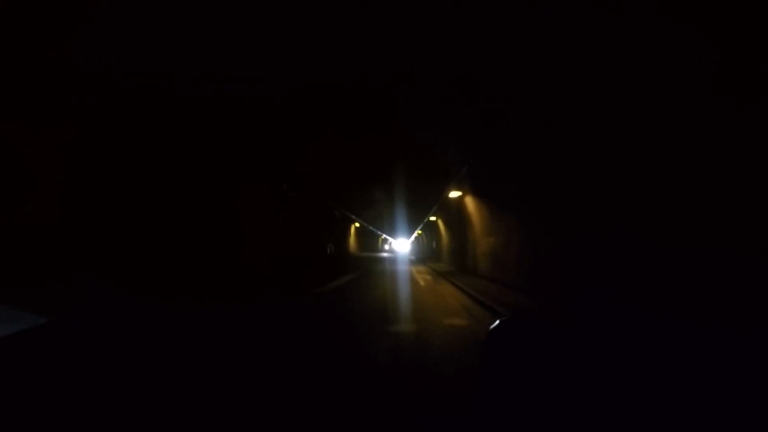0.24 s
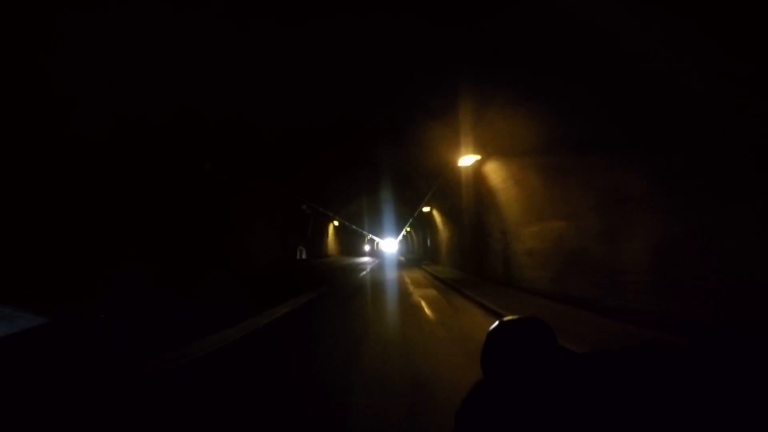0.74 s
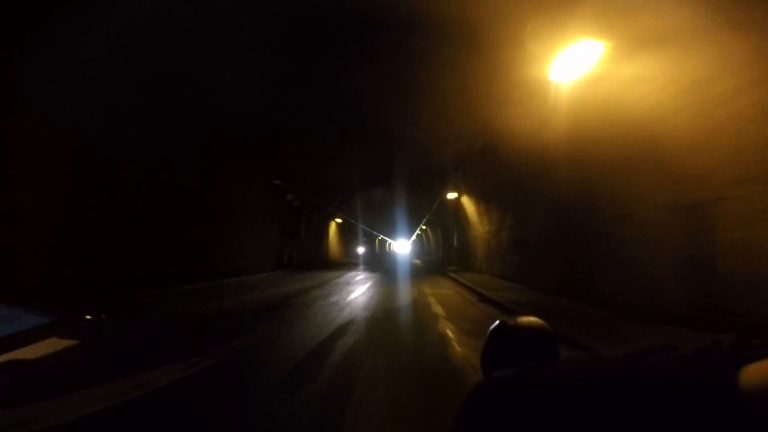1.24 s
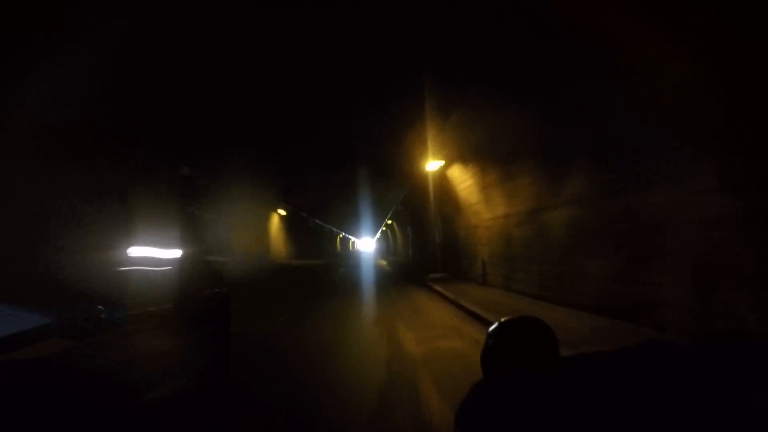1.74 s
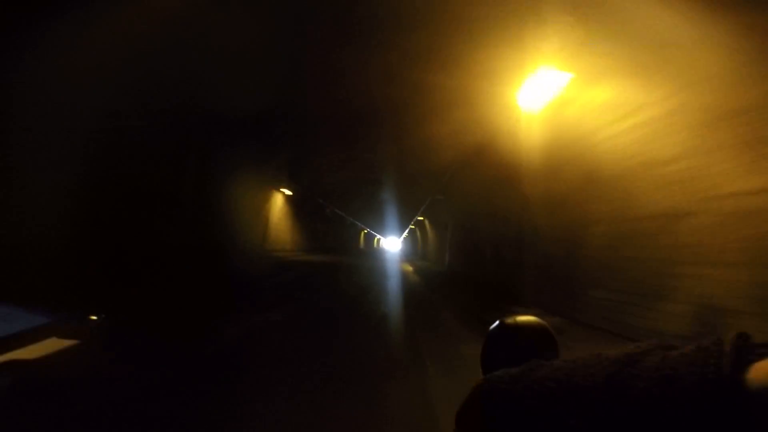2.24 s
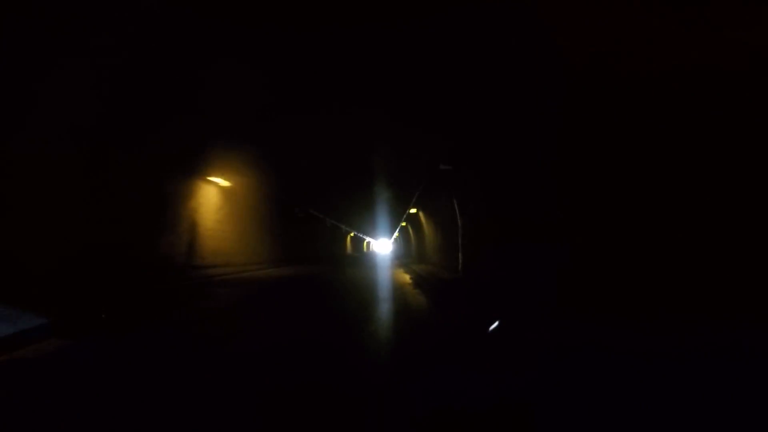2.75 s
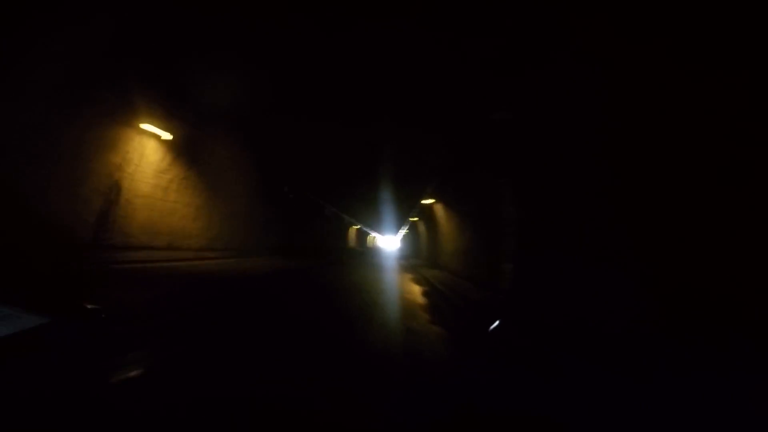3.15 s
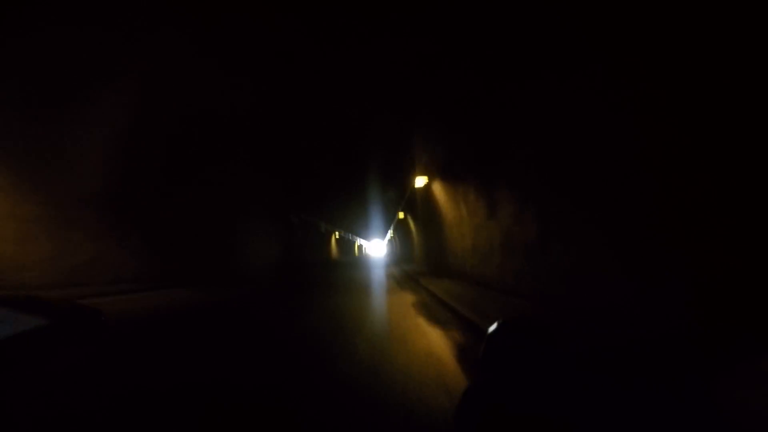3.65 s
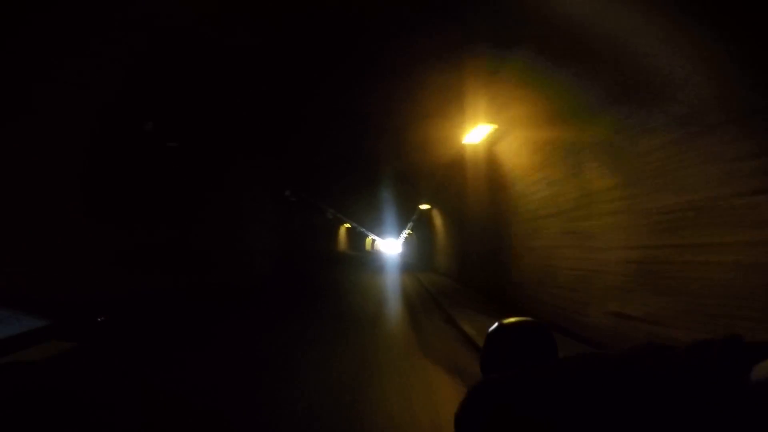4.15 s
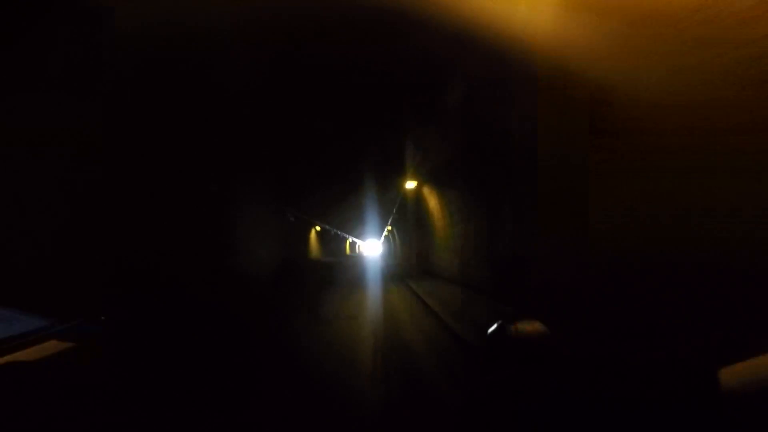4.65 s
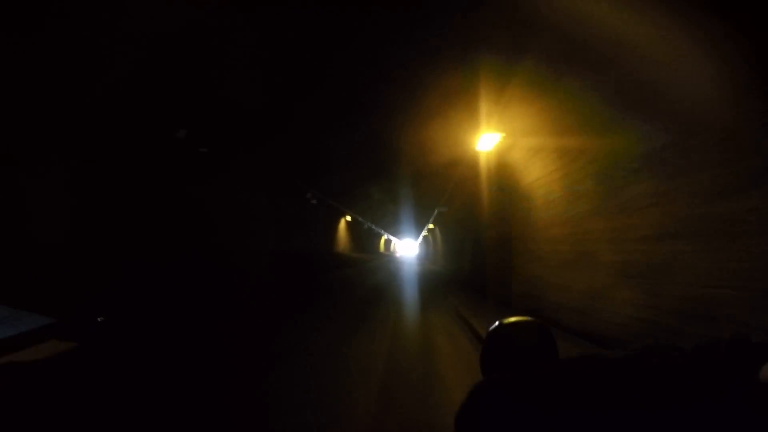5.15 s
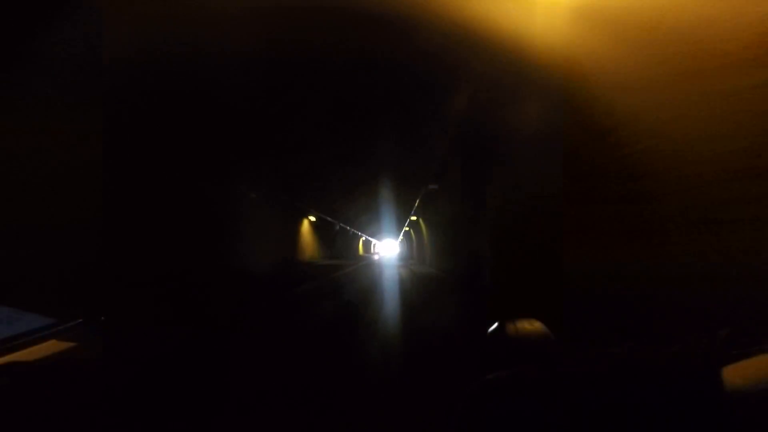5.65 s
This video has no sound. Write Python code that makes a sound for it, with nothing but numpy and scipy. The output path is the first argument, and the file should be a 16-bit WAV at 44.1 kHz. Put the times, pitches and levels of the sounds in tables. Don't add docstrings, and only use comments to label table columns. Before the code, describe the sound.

Muffled motorcycle ride in a road tunnel: deep fluttering shake and dull roar, broken once by a sharp two-part clack and rattle.

```python
import sys
import numpy as np
from scipy import signal
from scipy.fft import rfft, irfft
from scipy.io import wavfile
from scipy.ndimage import uniform_filter1d

SR = 44100
rng = np.random.default_rng(int(sys.argv[2]) if len(sys.argv) > 2 else 0)


def pcm_store(signal):
    levels = np.round(np.clip(np.atleast_2d(signal), -1, 1) * 32767)
    wavfile.write(sys.argv[1], SR, levels.astype(np.int16).T)


def field_ratio(decibels):
    return 10 ** (np.asarray(decibels, dtype=float) / 20)


N = 259749
TIME_S = np.arange(N) / SR
ROAR_DB = -30.5


def level(x, db):
    return x * field_ratio(db) / np.sqrt(np.mean(x ** 2))


def colour(points):
    hz, db = np.transpose(points)
    f = np.fft.rfftfreq(N, 1 / SR) + 1
    gain = field_ratio(np.interp(np.log(f), np.log(hz), db, -150, -150))
    return level(irfft(rfft(rng.standard_normal(N)) * gain, N), 0)


def ring(x, modes):
    return sum(field_ratio(db) * signal.lfilter(*signal.iirpeak(hz, hz / width_hz, fs=SR), x)
               for hz, width_hz, db in modes)


def muffle(x, hz, order=3):
    return signal.sosfilt(signal.butter(order, hz, fs=SR, output="sos"), x)


def smooth_twice(x, width):
    return uniform_filter1d(uniform_filter1d(x, width), width)


def walk(rate_hz):
    hold = int(SR / rate_hz)
    steps = np.repeat(rng.standard_normal(N // hold + 1), hold)
    return 1.28 * smooth_twice(steps, hold)[:N]


def duck_db():
    from_s, full_s, depth_db, recover_db_per_s = 3.55, 3.54, -9, 5
    times_s = [from_s, full_s, full_s - depth_db / recover_db_per_s]
    return np.interp(TIME_S, times_s, [0, depth_db, 0])


# start_s, load_db, traffic_db
RIDE = [(0, 0, 12), (.45, -1, 10.5), (1.15, 1, 8), (1.65, -1.5, 9), (2.0, 1.3, 7), (2.25, 1, 6.5),
        (2.33, -0.9, 2), (3.3, 1, 3), (4.3, 0, 2), (5.1, -1, 2.5), (5.4, 0.5, 2.5), (5.89, -0.5, 4.5)]


def ride():
    start_s, load_db, traffic_db = np.transpose(RIDE)
    return np.interp(TIME_S, start_s, load_db), np.interp(TIME_S, start_s, traffic_db)


# hz, level_db
HISS_SPECTRUM = [(2500, -25.5), (4100, 2), (4600, 2.5), (5300, -7.5), (6500, -9.5), (6950, -4),
                 (7350, -10.5), (10000, -15), (13000, -34), (16000, -66)]


def tunnel_hiss(traffic_db):
    from_s, gone_s, fade_s = 1.3, 2.5, .05
    passing_db = np.interp(TIME_S, [from_s, gone_s, gone_s + fade_s], [0, 6.5, 0])
    hiss_db = -45 + 2.5 + traffic_db + passing_db - 0.66 * duck_db()
    return colour(HISS_SPECTRUM) * field_ratio(ROAR_DB + duck_db() + hiss_db)


# hz, width_hz, level_db
CASE_2K_MODES = [(2065, 170, 15), (2950, 88, -7)]
CASE_4K_MODES = [(3716, 130, -5), (3400, 610, -0.5), (2835, 230, -6)]


def case_roar(white, throb_db, traffic_db):
    low = ring(ring(white, CASE_2K_MODES), [(2140, 1200, 0)])
    low_db = -17.5 + 0.12 * traffic_db + 1.1 * throb_db + 0.17 * walk(40)
    high = muffle(ring(ring(white, CASE_4K_MODES), CASE_4K_MODES), 3990, order=10)
    high_db = -31.5 + traffic_db + 0.1 * walk(40)
    both = level(low, -1.1) * field_ratio(low_db) + level(high, -0.65) * field_ratio(high_db)
    return both * field_ratio(ROAR_DB + duck_db())


# hz, level_db
FRAME_SPECTRUM = [(70, -41), (95, -5.5), (140, 0), (200, -5.5), (250, -7), (345, -11.5), (520, -8.5),
                  (690, -13.5), (900, -12), (1130, -15), (1190, -35.5), (1300, -19.5), (1850, -33),
                  (3000, -47.5), (4100, -52.5)]
# hz, width_hz, level_db
FRAME_MODES = [(138, 3.1, -9), (218.4, 2.9, -9.5), (299, 35, -6.5), (376, 47, -7.5), (423.9, 20, -3),
               (620.4, 44, -5), (746.3, 35, -6.5), (827, 26, -7.5), (1007.5, 84, -5.5), (1079, 18, -11)]


def frame_roar(white, throb_db, load_db):
    modes = level(ring(ring(white, FRAME_MODES), FRAME_MODES), -4.5)
    roar = level(colour(FRAME_SPECTRUM) + modes * field_ratio(2.1 * walk(18)), 0)
    return roar * field_ratio(ROAR_DB + throb_db + 0.48 * walk(30) + load_db + duck_db())


def road_roar(size):
    load_db, traffic_db = ride()
    swell = uniform_filter1d(size, size=2500) / uniform_filter1d(size, size=30000) - 1
    throb_db = 0.25 * walk(9) + 0.43 * swell
    white = rng.standard_normal(N)
    roar = frame_roar(white, throb_db, load_db)
    return roar + case_roar(white, throb_db, traffic_db) + tunnel_hiss(traffic_db)


# hz, level_db
BUZZ_SPECTRUM = [(3000, -22), (5000, 2), (8000, -5), (10000, -5.5), (12000, -5.5), (15000, -7.5),
                 (16000, -37)]


def loose_buzz(phase, size):
    width = uniform_filter1d(size, size=1500) ** 1.3
    twice = 1 + 0.58 * np.cos(2 * phase + 1.9)
    contact = width * twice * field_ratio(2.1 * walk(150) + 1.8 * walk(25))
    return level(colour(BUZZ_SPECTRUM) * contact, -71.5)


def spray(events):
    rise_share = 0.027
    out = np.zeros((3, N))
    for start_s, peak_db, body_db, edge_db, t60_s in events:
        age_s = np.clip(TIME_S - start_s, 0, None)
        rise = np.minimum(age_s / (rise_share * t60_s), 1)
        fade = rise * np.exp(-np.log(1000) * age_s / t60_s)
        out += field_ratio(peak_db + np.array([[body_db], [0], [edge_db]])) * fade
    return out * rng.standard_normal((3, N))


# hz, width_hz, level_db
KNOCK_EDGE = [(8650, 9400, -5.5), (10300, 1200, -5.5), (13300, 2100, -7.5)]


def through_case(body, case, edge):
    edge = ring(ring(edge, KNOCK_EDGE), KNOCK_EDGE)
    return field_ratio(20.5) * muffle(body, 1600) + field_ratio(9.5) * muffle(case, 4200) + field_ratio(7.0) * muffle(edge, 14000)


# first_s, period_s, first_db, step_db per bounce, body_db
CHATTER = [
    (3.4684, .0137, -27.5, -2.6, 4.5),
    (3.586, .0157, -26.5, -4, 8),
]
# hz, width_hz, level_db
LOOSE_MODES = [(2170, 720, -0.5), (4000, 2700, -6), (6100, 1800, -11.5)]


def case_chatter():
    bounces = []
    for (first_s, period_s, first_db, step_db, body_db), count in zip(CHATTER, (6, 5)):
        for k in range(count):
            edge_db = -24 - .3 * k * step_db
            bounces.append((first_s + k * period_s, first_db + k * step_db, body_db, edge_db, 0.044))
    body, case, edge = spray(bounces)
    body = ring(field_ratio(-4.5) * body, FRONT_BODY) + ring(field_ratio(-8.0) * body, REAR_BODY)
    return through_case(body, field_ratio(-6.0) * ring(case, LOOSE_MODES), field_ratio(3.5) * edge)


# start_s, peak_db, body_db, edge_db, t60_s
FRONT = [
    (3.4305, -23, 6, -34, .014),
    (3.4343, -20, 4, -16, .006),
    (3.44, -9.5, -7, -10, .008),
    (3.4418, -7.5, 3, -18, 0.0071),
    (3.4528, -16.5, 2, -27.5, 0.019),
    (3.4552, -9.5, -2, -22.5, .009),
    (3.459, -9, 4, -19, .016),
]
REAR = [
    (3.5724, -15, 5, -27.5, 0.015),
    (3.5788, -32.5, 22.8, -36, 0.03),
]
# hz, width_hz, level_db
FRONT_BODY = [(354, 140, -1), (626, 92, -6), (820, 140, -8), (940, 280, -7), (1410, 430, -14.5)]
REAR_BODY = [(450, 96, -5.5), (583, 220, -2.5), (878, 47, -9.5), (975, 100, -13), (1470, 360, -35)]
KNOCK_CASE = [(2040, 500, 0.5), (2850, 110, -8), (3740, 400, -1.5), (5850, 780, -7.5)]


def wheel_knocks():
    front, rear = spray(FRONT), spray(REAR)
    body = ring(front[0], FRONT_BODY) + ring(rear[0], REAR_BODY)
    return through_case(body, ring(front[1] + rear[1], KNOCK_CASE), front[2] + rear[2])


# start_s, pitch_hz, level_db, t60_s
JOLTS = [
    (3.433, 75, -6, .12),
    (3.578, 110, -13, .08),
    (3.452, 335, -3, .045),
    (3.5755, 520, -9, .035),
    (3.6, 260, -14, .07),
]


def jolts():
    out = np.zeros(N)
    for start_s, pitch_hz, level_db, t60_s in JOLTS:
        age_s = np.clip(TIME_S - start_s, 0, None)
        fade = np.minimum(age_s / 0.0039, 1) * np.exp(-np.log(1000) * age_s / t60_s)
        out -= field_ratio(level_db) * fade * np.sin(2 * np.pi * pitch_hz * age_s)
    return out


# start_s, pitch_hz, level_db, throbs until the next
STRETCHES = [(0, 36.47, -10.5, 1), (0.091, 46.85, -7.5, 2), (0.201, 45.07, -12, 1), (0.331, 45.13, -11, 2),
             (0.479, 40.58, -14, 1), (.7, 42.17, -10, 1), (.84, 43.5, -8.5, 2), (0.951, 41, -11, 1),
             (1.109, 44.66, -11.5, 1), (1.352, 45.44, -12, 2), (1.62, 44.3, -11, 3),
             (1.981, 38.25, -7.5, 2), (2.098, 44.2, -9, 1), (2.279, 43.47, -13, 2), (2.539, 48.13, -11, 2),
             (2.749, 45.66, -10.5, 1), (2.93, 38.5, -10.5, 2), (3.182, 40.6, -12.5, 2), (3.3, 43.7, -11, 1),
             (3.415, 40.3, -7.5, 1), (3.559, 37.03, -9.5, 1), (3.731, 37.83, -15.5, 4),
             (4.022, 44.9, -14.5, 1), (4.235, 39.97, -12.5, 4), (4.611, 42.2, -11.5, 2),
             (4.938, 45.43, -13, 2), (5.142, 40.3, -9, 1), (5.239, 40, -10.5, 3), (5.421, 42.23, -10, 3),
             (5.74, 41.8, -9.5, 1)]
CRESTS_S = [3.466, 3.612]
# hz, level_db
SKIRT_SPECTRUM = [(8, -45), (18, -17.5), (30, -13.5), (45, -24), (60, 4), (75, -11), (95, -25),
                  (130, -61.5)]


def clamp_swing():
    start_s, pitch_hz, level_db, throbs = np.transpose(STRETCHES)
    throbs = np.rint(throbs).astype(int)
    place = np.interp(TIME_S, np.r_[start_s, N / SR], np.r_[0, np.cumsum(throbs)])
    now = place.astype(int)
    own = np.repeat(np.arange(len(start_s)), throbs)
    count = len(own)
    step_chance, sign_chance, level_chance, pitch_chance = rng.standard_normal((count, 4)).T
    shared = throbs[own] > 1

    throb_hz = pitch_hz[own] + 1.5 * pitch_chance * shared
    pitch = np.interp(place, np.arange(count) + .5, throb_hz)
    phase = 2 * np.pi * np.cumsum(pitch + 1.82 * walk(20)) / SR

    out_of_step = np.clip(0.868 + 0.12 * step_chance, 0, 1)
    step = np.pi * np.cumsum(out_of_step * np.sign(sign_chance))
    step = step - step[0] + np.pi * 0.41
    fade_db = np.zeros(N)
    for i in (np.array(CRESTS_S) * SR).astype(int):
        to_crest = np.pi - phase[i] - step[now[i]]
        step = np.where(np.arange(count) >= now[i], step + to_crest, step)
        fade_db -= (now == now[i]) * 71 * np.maximum(TIME_S - TIME_S[i], 0)

    throb_db = level_db[own] + 0.75 * level_chance * shared
    push = (field_ratio(throb_db) * np.exp(1j * step))[now] * field_ratio(fade_db)
    handover_s = 0.047
    real, imag = smooth_twice([push.real, push.imag], int(handover_s * SR))
    swing = np.sqrt(2) * (real + 1j * imag) * field_ratio(1.5 * walk(14)) * np.exp(1j * phase)
    size = np.abs(swing)
    skirt = field_ratio(-17) * uniform_filter1d(size, size=9000) * colour(SKIRT_SPECTRUM)
    return skirt - swing.real, np.angle(swing), size


def scene():
    swing, phase, size = clamp_swing()
    mix = road_roar(size) + loose_buzz(phase, size)
    mix += case_chatter() + wheel_knocks() + jolts() + swing
    end_fade = np.minimum(np.arange(N)[::-1] / (.006 * SR), 1)
    return (mix * end_fade)[None]


def top_cut(x):
    return signal.sosfilt(signal.butter(12, 15610, fs=SR, output="sos"), x)


def record(dry):
    top = .97
    flat = dry / (1 + np.abs(dry / top) ** 6) ** (1 / 6)
    return top_cut(flat)


dry = scene()
out = record(dry)
pcm_store(out)
```